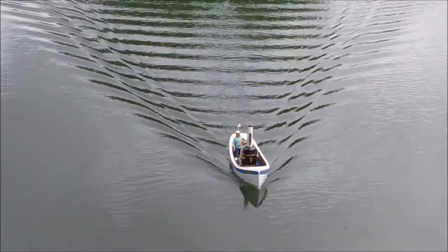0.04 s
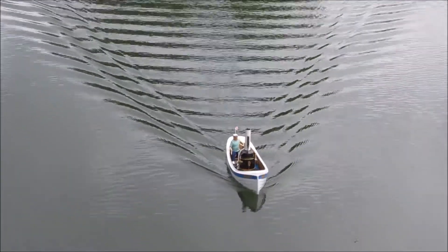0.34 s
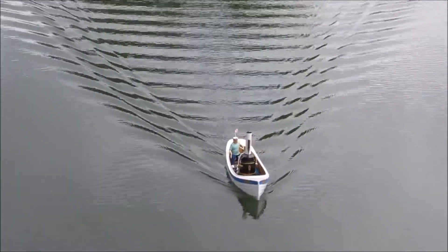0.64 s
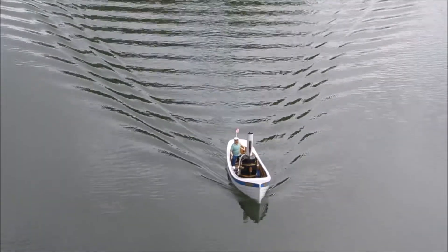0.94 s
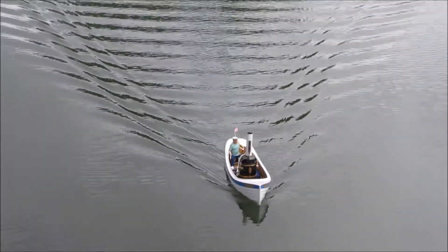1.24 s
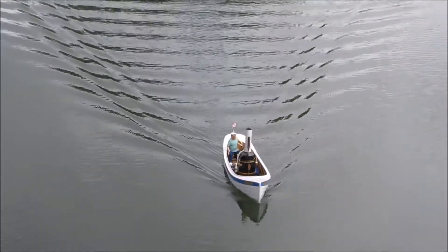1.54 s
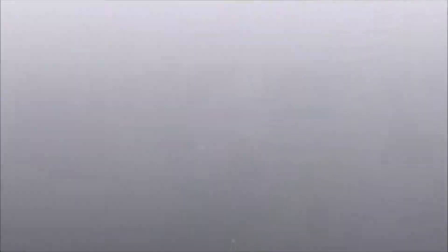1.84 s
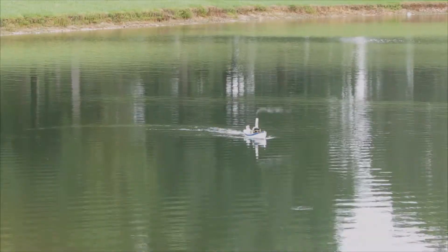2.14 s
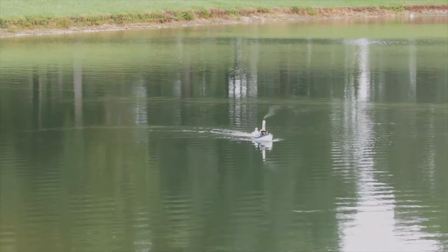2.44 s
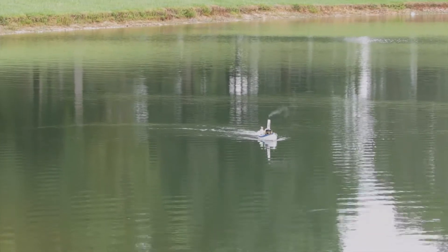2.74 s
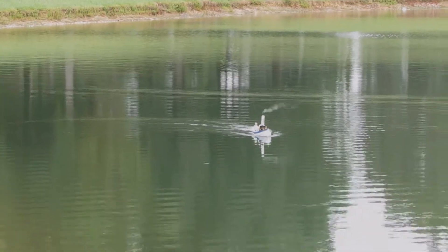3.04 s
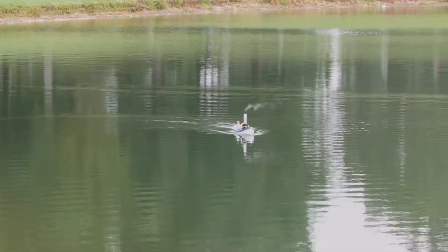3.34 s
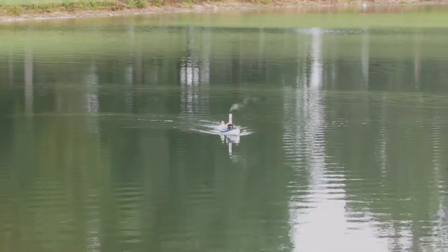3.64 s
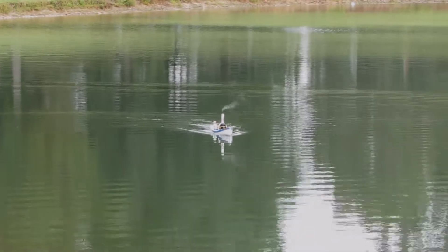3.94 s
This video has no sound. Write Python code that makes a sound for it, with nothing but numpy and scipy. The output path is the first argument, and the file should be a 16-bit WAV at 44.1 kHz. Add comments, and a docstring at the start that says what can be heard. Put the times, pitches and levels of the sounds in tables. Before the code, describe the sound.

Gusts of wind rumble and thump on a microphone outdoors by a pond, with high hiss and a faint whine like a small boat motor. After a sudden drop, soft air and far trills rise slowly, and another gust passes.

```python
"""Beside a pond, a stereo microphone out in the wind; two views joined by a hard cut.
From the start gusts buffet the microphone with a low rumble and soft bumps. Behind them lie a distant
outdoor rush, a high hiss and trills like far insects, and a thin whine like a small motor close by.
At about 1.9 s comes the cut to a much quieter view, which slowly fades up; one more gust passes
just after 3 s."""
import sys
import numpy as np
from scipy import signal
from scipy.fft import rfft, irfft, next_fast_len
from scipy.io import wavfile
from scipy.ndimage import map_coordinates

SR = 44100
rng = np.random.default_rng(int(sys.argv[2]) if len(sys.argv) > 2 else 0)


def wav_out(sig):
    """Save sig, one row per channel (or a flat mono array), as 16-bit PCM at SR to the path in sys.argv[1]."""
    wavfile.write(sys.argv[1], SR, np.round(np.clip(np.atleast_2d(sig).T, -1, 1) * 32767).astype(np.int16))


N = 176400
CUT_S = 1.884

# How alike the background is at the two ports. Each row: frequency in Hz, likeness from -1 to 1.
AIR_LIKENESS = [(300, 1), (1200, 0.77), (3000, 0.96), (6000, 0.63), (11000, 0.27)]


def amp(db):
    """Decibels to gain."""
    return 10 ** (np.asarray(db) / 20)


def unit(x):
    """Scale to rms 1."""
    return x / np.sqrt(np.mean(x ** 2) + 1e-20)


def pan(db):
    """Stereo gains that put the left db above the right."""
    return amp([[db / 2], [-db / 2]])


def along(points, hz):
    """Read (Hz, value) points on a log axis."""
    freqs, values = np.transpose(points)
    return np.interp(np.log(hz + 1), np.log(freqs + 1), values)


def curves(rows):
    """One value per sample for each column after the time."""
    times, *columns = np.transpose(rows)
    return [np.interp(np.arange(N) / SR, times, column) for column in columns]


def wobble(rate):
    """A smooth random curve, rate knots a second."""
    return map_coordinates(rng.standard_normal(size=1024), [np.arange(N) * rate / SR], mode="wrap")


def filtered(x, response):
    """Shape the spectrum of x by a gain that depends on frequency."""
    size = next_fast_len(N + SR // 4)
    return irfft(rfft(x, size) * response(np.fft.rfftfreq(size, 1 / SR)), size)[..., :N]


def noise(spectrum, likeness, pan_db, right_first=0):
    """Coloured stereo noise with a mid of rms 1; right_first (0-1) is how steadily the right leads."""
    def mid_side_gains(hz):
        angle = np.arccos(np.clip(along(likeness, hz), -.95, .995)) / 2
        return amp(along(spectrum, hz)) * [np.cos(angle), np.sin(angle)]

    mid, side = rng.standard_normal((2, N))
    side = np.sqrt(1 - right_first ** 2) * side + right_first * signal.hilbert(mid).imag
    mid, side = filtered(np.array([mid, side]), mid_side_gains)
    return np.array([mid + side, mid - side]) / mid.std() * pan(pan_db)


def buffeting(gusts, rumble_db, flutter_db, lumpy_db, pan_db, right_first):
    """Wind on the microphone: a rumble common to both ports and a lumpy flutter rocking between them."""
    # Colour of the wind. Each row: frequency in Hz, relative level in dB.
    rumble_spectrum = [(27, -62.5), (42, -4.5), (90, 2), (150, -4), (230, -12), (400, -26.5), (900, -59),
                       (2000, -120)]
    flutter_spectrum = [(60, -49.5), (150, 0), (240, -2.5), (340, -2), (480, -12), (700, -23.5),
                        (1200, -39), (3000, -120)]
    # How alike it is at the two ports. Each row: frequency in Hz, likeness (negative: opposite phase).
    rumble_likeness = [(30, 0.72), (70, 0.94), (120, 1), (230, 0.35)]
    flutter_likeness = [(130, -0.0063), (230, -1.1), (420, -0.58)]
    low_db, high_db = curves(gusts)
    lumps = unit(amp(lumpy_db * wobble(90)))
    rumble = noise(rumble_spectrum, rumble_likeness, pan_db, right_first)
    flutter = noise(flutter_spectrum, flutter_likeness, pan_db - 2.0, right_first)
    flutter_gain = amp(np.minimum(high_db + flutter_db, -25.5))  # stronger eddies come as single bumps
    return amp(low_db + rumble_db) * rumble + flutter_gain * lumps * flutter


def bumps():
    """Each eddy is a pressure swing of a cycle or two that reaches one port just before the other."""
    # Each row: time in seconds, peak in dB, pitch in Hz, side (+ left first), half width in cycles.
    eddies = [(.004, -6, 234, -0.88, 0.32), (0.074, -11, 280, -1.1, 0.71), (0.136, -13, 252, -0.43, 0.32),
              (.142, -5.5, 346, -0.66, 0.37), (0.182, -7.5, 260, 0.9, 0.31), (0.192, -15, 150, 0.39, 0.75),
              (.215, -7, 350, 0.58, 0.34), (.221, -13.5, 163, 0.83, 0.38), (0.262, -10.5, 185, -0.93, 0.46),
              (0.277, -8, 237, -1.15, 0.43), (.285, -12.5, 128, -0.51, 0.57), (0.295, -7, 270, 0.74, 0.28),
              (.318, -14, 174, 1, 0.56), (0.362, -7.5, 210, -0.8, 0.54), (.371, -20, 274, -1.26, 0.82),
              (0.39, -11, 268, -0.84, 0.5), (0.459, -20.5, 166, -1.3, 0.33), (.482, -7, 262, -0.75, 0.46),
              (0.5, -2.5, 260, 1, 0.45), (0.512, -12, 200, 0.7, 0.24), (.527, -13, 260, 0.92, 0.43),
              (.569, -10.5, 290, 0.78, 0.39), (0.584, -14, 243, -0.93, 0.47), (.595, -5.5, 313, 0.88, 0.35),
              (0.602, -1, 222, -0.57, 0.32), (.620, -12.5, 304, 0.48, 0.25), (.668, -9.5, 224, -1.05, 0.34),
              (0.704, -8.5, 205, -1.22, 0.48), (.747, -4, 390, -.73, .45), (.754, -6, 201, -0.77, 0.34),
              (0.936, -10.5, 165, -0.86, 0.35), (.957, -16.5, 185, -0.83, 0.52),
              (0.988, -12.5, 252, -0.84, 0.45), (1.019, -11.5, 207, 0.79, 0.37),
              (1.1, -10.5, 181, -0.96, 0.33), (1.371, -23.5, 198, -0.68, 0.38),
              (1.416, -17.5, 142, -0.65, 0.3), (1.497, -10.5, 100, -.8, 0.51),
              (1.587, -17, 229, 0.93, 0.57), (1.621, -12.5, 225, 0.89, 0.42), (1.679, -16.5, 202, -1, 0.49),
              (1.695, -2, 255, -0.93, 0.43), (1.773, -15.5, 183, -1.04, 0.42), (1.956, -45, 200, -.3, 0.32),
              (1.977, -47.5, 200, 0.093, 0.66), (2.41, -33.5, 142, -1.1, 0.53),
              (3.047, -23, 250, -1.02, 0.81), (3.189, -21.5, 180, -1.36, 0.5),
              (3.206, -19, 290, -0.84, 0.64), (3.236, -31.5, 217, -1.1, 0.71),
              (3.272, -19.5, 151, -0.71, 0.51), (3.308, -28.5, 251, -0.55, 0.55),
              (3.348, -29.5, 210, -0.63, 0.71), (3.411, -25, 330, -0.67, 0.83),
              (3.447, -25, 220, -0.51, 0.27), (3.483, -29.5, 285, -0.8, 0.4), (3.59, -29, 211, -0.6, 0.31),
              (3.652, -26, 200, -0.58, 0.38)]
    port_lag_s = 0.0014
    t, out = np.arange(N) / SR, np.zeros((2, N))
    for time_s, db, hz, side, width in eddies:
        phase = rng.uniform(0, 2 * np.pi)
        near = np.abs(t - time_s) < .03
        cycles = hz * (t[near] - time_s + side * port_lag_s * np.array([[.5], [-.5]]))
        out[:, near] += amp(db) * np.cos(2 * np.pi * cycles + phase) / np.cosh(cycles / width) ** 2
    return out


def background(air, rush_spectrum, hiss_spectrum, rush_db, hiss_db):
    """The distant rush of the outdoors and a high, even hiss."""
    low_db, treble_db = curves(air)
    rush = amp(low_db + rush_db + 0.17 * wobble(6.6)) * noise(rush_spectrum, AIR_LIKENESS, pan_db=-1.0)
    hiss = amp(treble_db + hiss_db) * noise(hiss_spectrum, AIR_LIKENESS, pan_db=1.5)
    return rush + hiss


def whine(air, harmonics, sidebands, rotation_hz, spacing_hz, level_db, pan_db):
    """High harmonics of a small motor close by, each with two sidebands; every line wavers on its own."""
    _, treble_db = curves(air)
    drifting_time = np.cumsum(1 + .0005 * wobble(6)) / SR
    out = np.zeros(N)
    for harmonic in range(14, 39):
        for offset_hz, spectrum in ((0, harmonics), (-spacing_hz, sidebands), (spacing_hz, sidebands)):
            hz = harmonic * rotation_hz + offset_hz
            knots_db = along(spectrum, hz) + 1.8 * rng.standard_normal(12)
            waver = np.interp(np.arange(N), np.linspace(0, N, len(knots_db)), amp(knots_db))
            out += waver * np.sin(2 * np.pi * (hz * drifting_time + rng.random()))
    return amp(treble_db + level_db) * unit(out) * pan(pan_db)


def swelling_partials(pan_db):
    """The strongest partials of the whine; each swells, wanders a little and sinks back."""
    # Each row: pitch in Hz, rms at the peak in dB, time of the peak and half length in seconds.
    partials = [(4822, -70.5, 1, 1.3), (5388, -70.5, 1, 1.2), (5954, -70, .6, .6), (6632, -69, 1.2, .8),
                (6363, -68, 1, .9), (6524, -70, 1, .9), (6831, -68, 1.65, .5), (7304, -69, 1.3, .6),
                (7360, -63, 1.75, .25), (7930, -66, 1.55, .45), (8226, -61, .72, .35),
                (8506, -62.5, 1.4, .6), (8791, -69, .7, .5), (9061, -60.5, 1.54, .22)]
    t, out = np.arange(N) / SR, np.zeros(N)
    for hz, db, peak_s, half_s in partials:
        swell = amp(db + 1.5 * wobble(1.7)) / np.sqrt(1 + ((t - peak_s) / half_s) ** 4)
        drifting_time = np.cumsum(1 + .0005 * wobble(11)) / SR
        out += swell * np.sqrt(2) * np.sin(2 * np.pi * hz * drifting_time)
    return out * pan(pan_db)


def sizzle(air, level_db):
    """A narrow, very high band of noise that follows the level of the treble."""
    # Each row: frequency in Hz, relative level in dB.
    spectrum = [(10200, -60), (10570, -20), (10660, 2), (10750, -4), (10920, -19), (11500, -60)]
    _, treble_db = curves(air)
    return amp(treble_db + level_db) * noise(spectrum, AIR_LIKENESS, pan_db=-3.0)


def squeal(air, hz=15734, level_db=-27.5):
    """A faint, steady tone at the edge of hearing, as from electronics."""
    _, treble_db = curves(air)
    return amp(treble_db + level_db) * np.sin(2 * np.pi * hz * np.arange(N) / SR)


def trills(bands, rise_db_per_s, fade_s=0.084):
    """Sharp-edged bands of far ringing, like choruses of insects; they may climb towards the end."""
    t, out = np.arange(N) / SR, np.zeros(N)
    for start, end, hz, width, db in bands:
        ringing = unit(filtered(rng.standard_normal(N), lambda f: 1 / (1 + ((f - hz) / width) ** 12)))
        fade = np.clip(np.minimum(t - start, end - t) / fade_s, 0, 1)
        out += amp(db) * ringing * fade
    return out * amp(rise_db_per_s * (t - t[-1]))


def scene():
    """The gusty view of the pond, then a hard cut to the quiet one."""
    # Wind at the microphone. Each row: time in seconds, relative rumble and flutter levels in dB.
    gusty_wind = [(0.0, -26.5, -20.5), (0.04, -44, -75), (0.072, -35, -25), (0.104, -27, -48.5),
                  (0.136, -39, -26.5), (0.182, -28, -45.5), (0.402, -28.5, -34), (0.434, -39.5, -54),
                  (0.496, -20.5, -33.5), (0.544, -31.5, -47.5), (0.602, -23, -28), (0.638, -30.5, -61),
                  (0.696, -27, -29), (0.726, -29, -48), (0.742, -27.5, -31), (0.81, -32, -51),
                  (1.026, -27.5, -42.5), (1.056, -31, -54), (1.444, -33, -53), (1.502, -18, -38.5),
                  (1.518, -30, -56), (1.586, -30, -46.5), (1.664, -33.5, -54), (1.696, -20, -28),
                  (1.738, -30.5, -53.5), (1.88, -42, -51.5)]
    quiet_wind = [(1.9, -58, -95), (1.92, -68, -79), (1.99, -55, -58), (2.07, -73, -91),
                  (2.33, -63.5, -77.5), (2.41, -65, -62), (2.44, -58, -74), (2.78, -65, -76),
                  (3.01, -46.5, -72), (3.04, -45, -52.5), (3.15, -48, -55.5), (3.2, -44.5, -41),
                  (3.39, -42.5, -50.5), (3.41, -42.5, -41.5), (3.53, -46, -58), (3.67, -50, -59),
                  (3.69, -57.5, -71), (4.0, -58.5, -67.5)]
    # The air behind it. Each row: time in seconds, relative rush and treble levels in dB.
    gusty_air = [(0.04, -51, -54.5), (0.1, -55.5, -57), (0.486, -50.5, -49), (0.814, -53, -51),
                 (1.564, -48.5, -48.5), (1.86, -52, -48.5)]
    quiet_air = [(1.92, -75.5, -99), (2.13, -73.5, -99), (2.2, -71.5, -93.5), (2.72, -65, -90.5),
                 (3.21, -63, -82.5), (3.8, -60, -83.5), (4.0, -59, -80.5)]
    # Colour of the far rush and hiss and the near whine. Each row: frequency in Hz, relative level in dB.
    gusty_rush = [(100, -7.5), (400, -15), (700, -1), (1000, 0), (1600, -7), (2300, -15.5), (3300, -19),
                  (5000, -22.5), (11000, -28), (15500, -42)]
    quiet_rush = [(100, 10), (300, -1.5), (520, -9.5), (800, 2), (1200, -2.5), (2200, -12), (2750, -15),
                  (3700, -20), (6000, -24), (15500, -37)]
    gusty_hiss = [(2500, -37), (4000, -12.5), (5200, -8.5), (6400, -2.5), (7800, -4.5), (9000, -7),
                  (10400, -8.5), (11300, -19.5), (13000, -23), (15500, -37)]
    quiet_hiss = [(2500, -21), (4300, -19), (5200, -5), (6300, 8), (8000, 7), (9500, 0), (12000, -7),
                  (15500, -24)]
    gusty_harmonics = [(3900, -0.5), (4800, -13), (6300, 2.5), (7400, 2.5), (8250, 1.5), (9350, 4),
                       (9900, -7.5), (10800, 3)]
    quiet_harmonics = [(3900, -8), (4600, 9), (5300, -4), (5800, 11.5), (6750, 9), (8000, -3), (9000, -12)]
    gusty_sidebands = [(3900, -11), (4700, -1), (5200, -7.5), (6300, 7.5), (7600, -4), (8700, -4.5),
                       (10800, -15)]
    quiet_sidebands = [(3900, -23), (4550, -9), (5300, -12), (5800, 1), (6600, -2.5), (7600, -9),
                       (9000, -14)]
    # Far ringing. Each row: start and end in seconds, centre and half width in Hz, relative level in dB.
    gusty_trills = [(.33, .98, 8800, 480, -61.5)]
    quiet_trills = [(1.85, 4.1, 2500, 135, -73.5), (1.85, 4.1, 2545, 25, -77.5),
                    (1.85, 4.1, 2915, 125, -76), (1.85, 4.1, 2891, 20, -81), (2.56, 3.02, 8080, 100, -81),
                    (2.85, 3.7, 6250, 600, -78)]

    gusty = buffeting(gusty_wind, rumble_db=0.34, flutter_db=3.5, lumpy_db=5.0,
                      pan_db=0.33, right_first=0.92)
    gusty += background(gusty_air, gusty_rush, gusty_hiss, rush_db=3.5, hiss_db=-6.0)
    gusty += whine(gusty_air, gusty_harmonics, gusty_sidebands, rotation_hz=283.55, spacing_hz=110,
                   level_db=-6.0, pan_db=-3.5)
    gusty += swelling_partials(pan_db=-3.5) + trills(gusty_trills, rise_db_per_s=0)
    gusty += sizzle(gusty_air, level_db=-12.5) + squeal(gusty_air)

    quiet = buffeting(quiet_wind, rumble_db=2.5, flutter_db=-2.5, lumpy_db=7.5,
                      pan_db=0.5, right_first=0.73)
    quiet += background(quiet_air, quiet_rush, quiet_hiss, rush_db=5.0, hiss_db=-0.5)
    quiet += whine(quiet_air, quiet_harmonics, quiet_sidebands, rotation_hz=232.0, spacing_hz=85,
                   level_db=7.0, pan_db=-1.5)
    quiet += trills(quiet_trills, rise_db_per_s=6) + squeal(quiet_air)
    return np.where(np.arange(N) / SR < CUT_S, gusty, quiet) + bumps()


def record(dry):
    """The sound fades in over a few milliseconds; the camera keeps nothing above its band limit."""
    fade_in_s, top_hz = .004, 15800
    fade_in = np.minimum(np.arange(N) / SR / fade_in_s, 1)
    return filtered(dry * fade_in, lambda hz: hz < top_hz)


dry = scene()
out = record(dry)
wav_out(out)
```